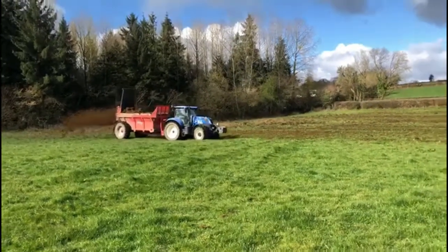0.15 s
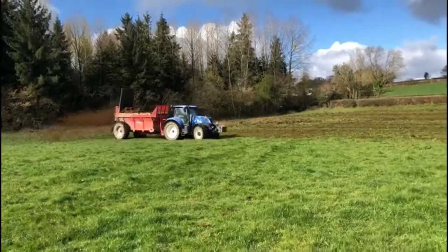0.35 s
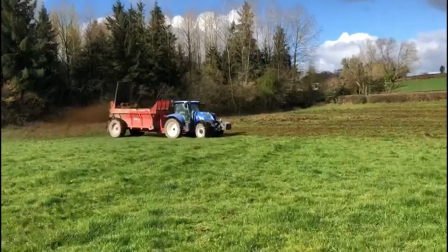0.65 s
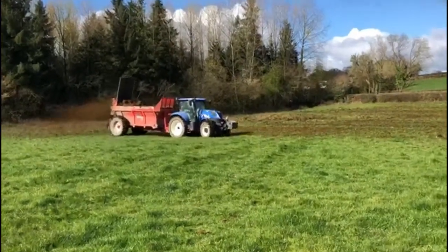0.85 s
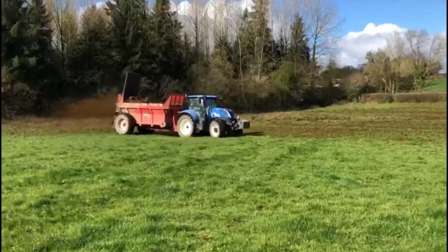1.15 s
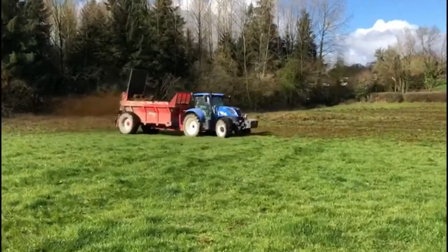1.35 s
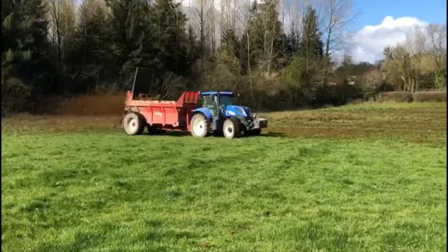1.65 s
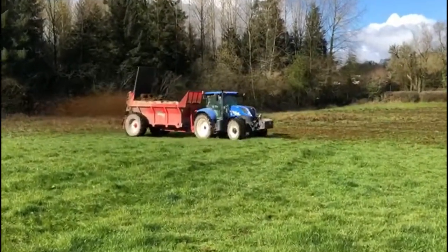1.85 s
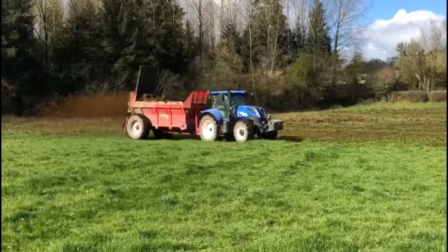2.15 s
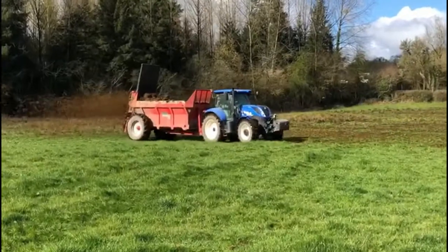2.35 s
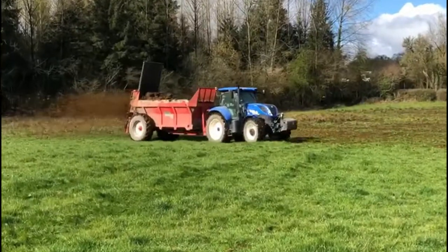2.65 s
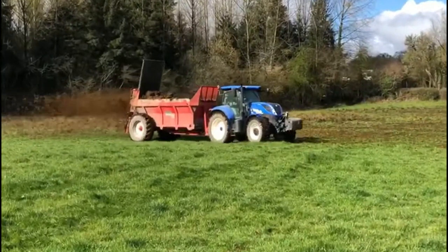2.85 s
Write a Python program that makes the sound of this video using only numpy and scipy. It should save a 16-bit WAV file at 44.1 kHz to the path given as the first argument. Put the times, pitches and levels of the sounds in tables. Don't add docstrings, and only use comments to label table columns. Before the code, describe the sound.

A diesel tractor roars throughout at constant engine speed, some way off in an open field, its rapid firing clatter mixed with gear whine, exhaust hum and faint turbo whistle. Flung muck hisses, swelling near 0.5, 1.2 and 2 s. Low wind rumbles early; dense short thumps hit the phone microphone from 1.2 to 2.05 s, then wind eases while chain whine rises around 2.2 s.

```python
import sys
import numpy as np
from scipy import signal
from scipy.fft import rfft, irfft, next_fast_len
from scipy.io import wavfile
from scipy.ndimage import uniform_filter1d, map_coordinates

SR = 44100
rng = np.random.default_rng(int(sys.argv[2]) if len(sys.argv) > 2 else 0)


def file_out(sig):
    cols = np.atleast_2d(sig).T
    lim = np.clip(cols, -1, 1)
    pcm = np.round(lim * 32767).astype(np.int16)
    wavfile.write(sys.argv[1], SR, pcm)


def rack_gain(trim_db):
    fader = np.asarray(trim_db, float)
    return 10 ** (fader / 20)


N = 132300

CYCLE_HZ, CYLINDERS = 16.35, 6
# start_s [s], pitch_hz [Hz], level_db [dB rms]
TURBO_WHISTLE = [(0, 10180, -80), (.27, 10230, -74), (.34, 10260, -63), (.5, 10330, -61), (.62, 10340, -75),
                 (.86, 10230, -78), (.93, 10190, -60), (1.15, 10120, -62), (1.35, 10100, -70),
                 (1.78, 10110, -77), (1.92, 10140, -62), (2.0, 10170, -75), (2.18, 10230, -70),
                 (2.38, 10270, -78), (2.47, 10330, -63), (2.56, 10380, -76), (2.82, 10520, -72),
                 (3, 10600, -75)]


def unit(x):
    return x / np.sqrt(np.mean(x ** 2) + 1e-20)


def along(points, hz):
    f, v = np.transpose(points)
    return np.interp(np.log(hz + 1e-3), np.log(f), v)


def curves(rows):
    s, *cols = np.transpose(rows)
    return [np.interp(np.arange(N) / SR, s, c) for c in cols]


def wobble(rate):
    return map_coordinates(rng.standard_normal(400), [np.arange(N) * rate / SR])


def filtered(x, response):
    m = next_fast_len(len(x) + SR // 2)
    spectrum = rfft(x, m) * response(np.fft.rfftfreq(m, 1 / SR))
    return irfft(spectrum, m)[:len(x)]


def rush(patchy_db):
    z = signal.stft(rng.standard_normal(N), nperseg=512)[2]
    field = uniform_filter1d(rng.standard_normal(z.shape), size=5, axis=0)
    field = uniform_filter1d(field, size=12, axis=1)
    return signal.istft(z * rack_gain(patchy_db * unit(field)), nperseg=512)[1][:N]


def whine(lines, unsteady_db, wander_hz):
    t = np.arange(N) / SR
    total = np.zeros(N)
    for hz, db in lines:
        level = np.sqrt(2) * rack_gain(db + unsteady_db * wobble(4.89))
        drift = np.cumsum(wander_hz * wobble(14)) / SR
        total += level * np.sin(2 * np.pi * (hz * t + drift + rng.random()))
    return total


def wind():
    # start_s [s], strength_db [dB]
    gusts = [(0, -60), (.15, -33), (.32, -29), (.5, -32.5), (.88, -36.5), (1.08, -32.5), (1.3, -29.5),
             (1.8, -30), (2.03, -30.5), (2.2, -38.5), (2.6, -35), (3, -46)]
    # pitch_hz [Hz], level_db [dB per Hz]
    rumble = [(15, -58), (30, -18), (60, -3), (150, 0), (240, -7.5), (310, -17), (420, -19), (900, -120)]
    # centre_s [s], half_length_s [s], level_db
    # [dB], centre_hz [Hz]
    puffs = [(0.317, 0.004, -24, 163), (0.473, 0.0049, -27.5, 162), (1.201, 0.0025, -23.5, 247),
             (1.234, 0.0019, -20, 245), (1.244, 0.0017, -17, 215), (1.259, 0.0016, -22.5, 372),
             (1.271, 0.0055, -21.5, 186), (1.284, 0.0057, -22, 110), (1.391, 0.00094, -16.5, 218),
             (1.4, 0.0035, -18, 241), (1.41, 0.0059, -34, 244), (1.414, 0.0035, -18.5, 108),
             (1.46, 0.0045, -26.5, 242), (1.469, 0.0029, -30.5, 426), (1.47, 0.0028, -13, 212),
             (1.483, 0.0077, -19.5, 139), (1.581, 0.0034, -25, 250), (1.594, 0.006, -23, 143),
             (1.609, 0.0033, -21, 164), (1.618, 0.0015, -20.5, 328), (1.683, 0.0047, -23, 139),
             (1.707, 0.0024, -20.5, 376), (1.707, 0.0039, -16.5, 159), (1.713, 0.002, -24, 486),
             (1.715, 0.0015, -8, 247), (1.72, 0.0018, -26.5, 247), (1.727, 0.0033, -25, 143),
             (1.74, 0.0019, -20.5, 372), (1.747, 0.0052, -19, 126), (1.755, 0.0036, -25, 283),
             (1.761, 0.0011, -25.5, 489), (1.764, 0.0075, -20, 245), (1.765, 0.0036, -17, 125),
             (1.772, 0.0017, -29, 560), (1.775, 0.0021, -13, 288), (1.777, 0.0044, -23.5, 141),
             (1.81, 0.0028, -17.5, 139), (1.82, 0.0029, -16, 351), (1.82, 0.0021, -11.5, 187),
             (1.85, 0.0053, -27.5, 185), (1.872, 0.0025, -20.5, 320), (1.877, 0.0064, -25, 109),
             (1.893, 0.0036, -21, 124), (1.932, 0.0029, -17.5, 139), (1.951, 0.0074, -24.5, 162),
             (1.971, 0.0037, -24, 143), (2.007, 0.004, -28.5, 187), (2.024, 0.0049, -21.5, 165),
             (0.226, 0.0051, -31.5, 219), (0.263, 0.0013, -23.5, 322), (0.281, 0.0023, -23.5, 163),
                (0.291, 0.0017, -26, 186), (0.321, 0.0092, -26, 71), (0.342, 0.0022, -25, 324),
                (0.346, 0.0053, -29, 125), (0.383, 0.0027, -33, 143), (0.531, 0.0062, -28, 94),
                (0.662, 0.0016, -25.5, 163), (0.775, 0.0079, -33, 168), (0.823, 0.0035, -29, 160),
                (1.14, 0.0019, -24.5, 218), (1.146, 0.0041, -31, 466), (1.154, 0.0013, -25.5, 380),
                (1.156, 0.0031, -24, 141), (1.237, 0.0024, -28, 426), (1.257, 0.0027, -22, 187),
                (1.262, 0.014, -28, 72), (1.274, 0.0016, -32, 372), (1.303, 0.0031, -25, 144),
                (1.333, 0.006, -33, 164), (1.397, 0.0025, -38, 426), (1.405, 0.0046, -15.5, 83),
                (1.428, 0.0057, -33, 213), (1.444, 0.0068, -33, 143), (1.455, 0.0062, -24, 72),
                (1.478, 0.0045, -23, 72), (1.517, 0.0053, -35, 164), (1.528, 0.0099, -31, 63),
                (1.603, 0.0014, -23, 372), (1.623, 0.0032, -27.5, 164), (1.643, 0.0029, -23, 125),
                (1.658, 0.0025, -25, 143), (1.671, 0.0033, -25.5, 217), (1.75, 0.0028, -31, 247),
                (1.783, 0.0027, -26, 164), (1.794, 0.0043, -27, 215), (1.807, 0.0029, -24.5, 324),
                (1.824, 0.0015, -29, 215), (1.855, 0.0069, -24.5, 82), (1.927, 0.0018, -28, 324),
                (1.938, 0.0034, -29, 276), (2.011, 0.0016, -25, 247), (2.033, 0.005, -25, 82),
                (2.06, 0.0037, -24.5, 193), (2.437, 0.0059, -33, 172), (2.639, 0.0087, -27.5, 184),
             (0.223, 0.0093, -39, 366), (0.29, .003, -33, 560), (.318, .003, -37, 515),
             (0.509, 0.0064, -35, 313), (.59, 0.0027, -30, 306), (0.702, 0.0015, -27, 210),
             (0.756, 0.001, -27.5, 290), (1.254, 0.0012, -30.5, 745), (2.357, 0.0037, -36, 302),
             (2.495, 0.0049, -36.5, 317), (2.71, 0.0052, -33.5, 306)]
    # share of its centre pitch [ratio], level_db [dB]
    puff_air = [(.1, -38), (.2, -7), (.45, -12), (1, -8), (1.8, -7.5), (2.8, -34), (4.5, -28), (9, -120)]
    sag, fray = .15, .32

    strength_db, = curves(gusts)
    lumps = rack_gain(.9 * wobble(14) + 1.8 * wobble(40)) * rng.standard_normal(N)
    out = rack_gain(strength_db - 2.5) * unit(filtered(lumps, lambda f: rack_gain(along(rumble, f))))

    reach = SR // 20
    t = np.arange(-reach, reach) / SR
    for s, length, db, hz in puffs:
        turns = hz * t * (1 - .5 * sag * t / length)
        thump = np.sqrt(2) * np.sin(2 * np.pi * (turns + rng.random()))
        air = unit(filtered(rng.standard_normal(len(t)), lambda f: rack_gain(along(puff_air, f / hz))))
        swell = np.exp(-.5 * (t / length) ** 2)
        out[round(s * SR) - reach:][:len(t)] += rack_gain(db) * swell * (thump + fray * air)
    return out


def turbo():
    hz, level_db = curves(TURBO_WHISTLE)
    phase = 2 * np.pi * np.cumsum(hz + 12 * wobble(40)) / SR
    return np.sqrt(2) * rack_gain(level_db + 1.9 * wobble(28.5)) * np.sin(phase)


def spreader(beat):
    # start_s [s], level_db [dB]
    flung = [(0, -50.5), (.33, -52), (.52, -43.5), (.63, -49.5), (1.22, -44.5), (1.38, -46), (1.63, -51),
             (2.03, -46), (2.2, -49), (2.72, -49.5), (2.9, -48.5), (3, -49)]
    # pitch_hz [Hz], level_db [dB per Hz]
    spray = [(2060, -3.5), (3500, -4.5), (4610, -7), (6140, -3), (7850, -5), (8670, -11.5), (9980, -9.5),
             (10500, -13), (11600, -19.5), (15100, -56), (22000, -120)]
    level_db, = curves(flung)
    hiss = rush(patchy_db=1.35) * (1.1 + 0.14 * beat)
    hiss = unit(filtered(hiss, lambda f: rack_gain(along(spray, f))))
    return rack_gain(level_db + 1.83 + 0.45 * wobble(9.2)) * hiss


def clods():
    per_s, size = 80, 6.5
    return (rng.random(N) < per_s / SR) * size * rng.standard_normal(N)


def rings():
    # pitch_hz [Hz], width_hz [Hz], level_db [dB rms]
    fan_bands = [(2702, 70, -55.5), (3100, 51, -60), (6040, 210, -60)]
    total = np.zeros(N)
    for hz, width, db in fan_bands:
        band = filtered(rng.standard_normal(N), lambda f: 1 / (1 + (2 * (f - hz) / width) ** 2))
        total += rack_gain(db + 1.9 * wobble(3.7)) * unit(band)
    return total


def firing(pattern_db):
    knock_s = .008
    turns = CYLINDERS * np.cumsum(CYCLE_HZ * (1 + 0.001517 * wobble(2.7))) / SR
    which = turns.astype(int)
    luck_db = 1.5 * rng.standard_normal(which[-1] + 1)[which]
    size = rack_gain(np.take(pattern_db, which % CYLINDERS) + luck_db)
    rattle = rng.standard_normal(round(SR / CYCLE_HZ))
    repeat = rattle[(turns / CYLINDERS % 1 * len(rattle)).astype(int)]
    decay = np.exp(-(turns % 1) / (CYCLE_HZ * CYLINDERS * knock_s))
    return unit(size * decay), repeat


def tractor(beat, repeat):
    # start_s [s], level_db [dB]
    carry = [(0, -40.5), (.3, -39.5), (.52, -37), (.65, -39), (1.05, -39), (1.22, -37), (1.65, -36.5),
             (2, -36.5), (2.2, -37.5), (2.7, -39.5), (3, -38.5)]
    # pitch_hz [Hz], level_db [dB per Hz]
    block = [(180, 3), (300, 1.5), (456, 1), (541, 1), (620, -1.5), (1280, -6), (1380, -6.5), (1550, -5.5),
             (4500, -20), (5850, -20.5), (9900, -120)]
    # pitch_hz [Hz], width_hz [Hz], level_db [dB]
    panel_modes = [(1270, 380, 1.5), (1870, 530, -5), (3140, 1100, 3)]
    # multiple of the engine cycle [ratio], level_db [dB rms]
    exhaust = [(9, -50.5), (12, -48), (15, -51.5), (6, -49.5)]
    # pitch_hz [Hz], level_db [dB rms]
    gears = [(723, -50.5), (885, -54), (1114, -50.5), (1216, -47.5), (1626, -60), (1768, -55),
             (1907, -53.5), (2331, -60), (2923, -60)]
    # pitch_hz [Hz], level_db [dB rms]
    chains = [(877, -59.5), (990, -58.5), (1314, -58), (1497, -59), (1610, -56.5)]
    # start_s [s], gears_db [dB], chains_db [dB]
    facing = [
        (0, -8.5, -19),
        (.6, -10, -21),
        (1.2, 1, -30),
        (1.9, -1, 1.5),
        (2.2, -7.5, 7.5),
        (3, -5, 2.5),
    ]
    knock_share, knock_hz, repeat_share = .34, 1700, .45
    ground_hz, ground_width, ground_dip = 385, 95, .82

    def knock_tone(f):
        return knock_share * f ** 2 / (f ** 2 + knock_hz ** 2)

    def body(f):
        panels = 1 + sum(rack_gain(db) / (1 + (2 * (f - c) / w) ** 2) for c, w, db in panel_modes)
        ground = 1 - ground_dip * np.exp(-((f - ground_hz) / ground_width) ** 2)
        return rack_gain(along(block, f)) * panels * ground

    level_db, = curves(carry)
    gas = rush(patchy_db=0.94) + repeat_share * repeat
    knocks = filtered(gas * (beat - beat.mean()), knock_tone)
    roar = unit(filtered(gas + knocks + clods(), body))

    gears_db, chains_db = curves(facing)
    tones = rack_gain(gears_db) * whine(gears, 2.9, 7.03)
    tones += rack_gain(chains_db) * whine(chains, 2.6, 9.0)
    tones += rack_gain(level_db - level_db.mean()) * rings()
    orders = whine([(k * CYCLE_HZ, db) for k, db in exhaust], 2.2, 0.91)
    return rack_gain(level_db + 1.67 + 0.12 * wobble(7.7)) * roar + tones + orders


def scene():
    spray_firing = [6, 0, 1, 0, 1, 0]
    block_firing = [8, 2, -3, 6, 1, -3]
    beat, repeat = firing(block_firing)
    spray_beat, _ = firing(spray_firing)
    return (wind() + turbo() + spreader(spray_beat) + tractor(beat, repeat))[None]


def dropouts(x):
    # pitch_hz [Hz], share of time lost [0-1]
    lost = [(6000, 0), (8300, .01), (8600, .2), (8900, .04), (10300, .14), (10600, .33), (11100, .4),
            (11400, .5), (11800, .72)]
    hz, t, z = signal.stft(x, SR, nperseg=2048)
    start_s, _, level_db = np.transpose(TURBO_WHISTLE)
    whistle = np.interp(t, start_s, level_db)
    whistle = unit(uniform_filter1d(whistle - whistle.mean(), size=5))
    luck = unit(uniform_filter1d(rng.standard_normal((130, len(t))), size=3, axis=1))
    luck = luck[np.arange(len(hz)) // 8]
    luck = .9 * luck - .55 * np.outer(hz > 10300, whistle)
    keep = 1 / (1 + np.exp(-1.7 * luck)) > along(lost, hz)[:, None]
    return signal.istft(z * keep, SR, nperseg=2048)[1][:N]


def roll_off(x):
    return signal.sosfilt(signal.butter(12, 11750, fs=SR, output="sos"), x)


def record(dry):
    bass_hz, top_hz = 41, 11800
    band = lambda f: (f < top_hz) / np.sqrt(1 + (bass_hz / (f + 1)) ** 6)
    mix = filtered(dropouts(dry[0]), band)[None]
    return roll_off(mix)


dry = scene()
out = record(dry)
file_out(out)
```